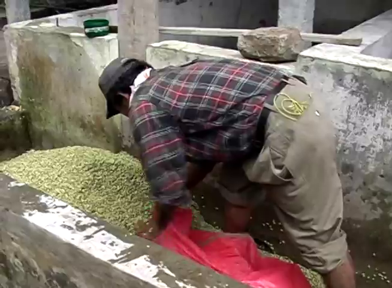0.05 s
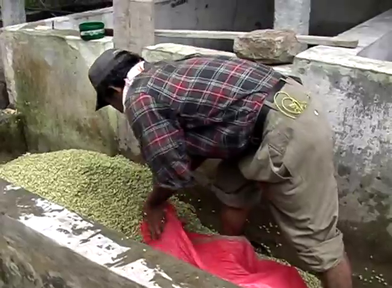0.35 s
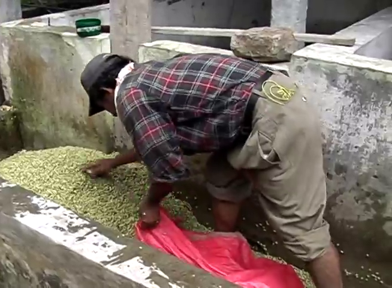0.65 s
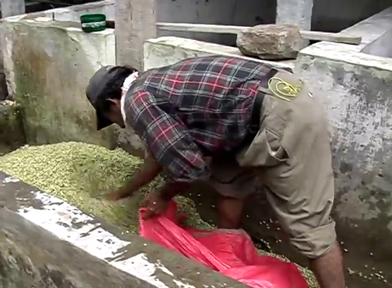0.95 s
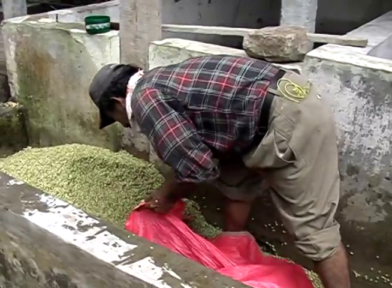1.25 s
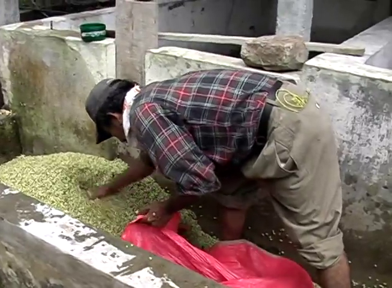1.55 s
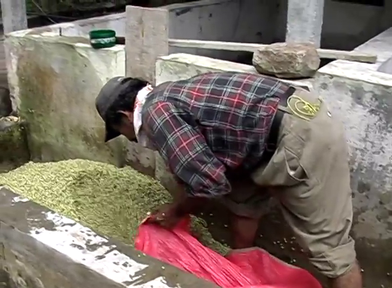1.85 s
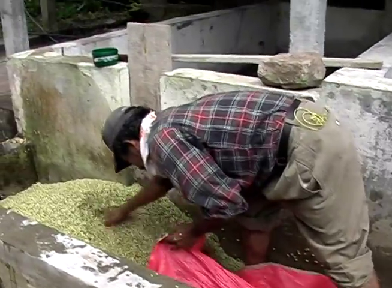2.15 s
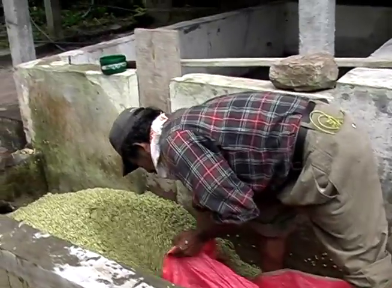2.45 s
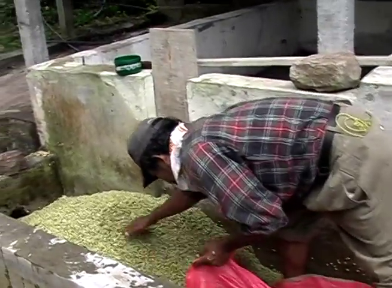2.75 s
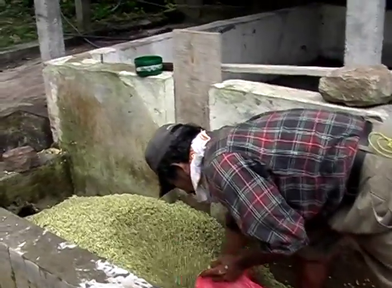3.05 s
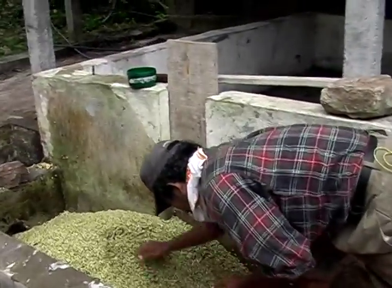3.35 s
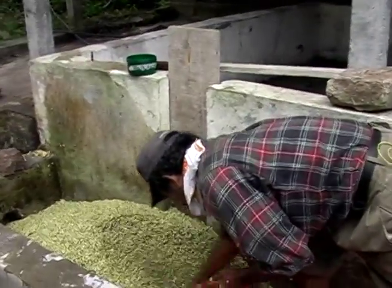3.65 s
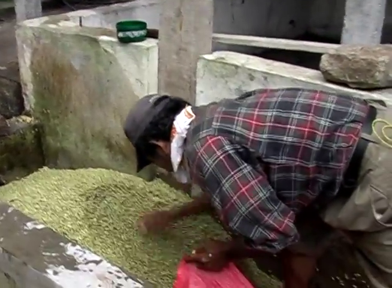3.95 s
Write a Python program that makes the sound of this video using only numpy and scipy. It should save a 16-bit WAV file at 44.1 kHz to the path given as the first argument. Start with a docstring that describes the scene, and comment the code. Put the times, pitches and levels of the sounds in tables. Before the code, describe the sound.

A hand repeatedly rakes dry beans and shoves them, pattering, into a crinkling plastic sack.

```python
"""Dry beans are swept by hand from a heap in a concrete tank into a woven plastic sack.
First the sack crinkles and snaps as it is tugged open, and one faint ping comes from the yard.
Then, five times over, the hand rakes the heap and shoves the load over the sack's mouth in a bright rush,
and the beans patter down inside. Loose beans trickle between strokes. From the second shove on, a few
light bumps thud on the microphone housing, and the sizzle of beans skating on plastic grows."""
import sys
import numpy as np
from scipy.fft import rfft, irfft
from scipy.io import wavfile
from scipy.ndimage import uniform_filter1d

SR = 44100
rng = np.random.default_rng(int(sys.argv[2]) if len(sys.argv) > 2 else 0)


def persist_wave(psi):
    """Save psi, clipped to +-1, as 16-bit WAV."""
    counts = np.round(np.clip(psi, -1, 1) * 32767).astype(np.int16)
    wavfile.write(sys.argv[1], SR, np.atleast_2d(counts).T)


N = 176400
T = np.arange(N) / SR
HZ = np.maximum(np.arange(N // 2 + 1) * SR / N, 1)

# stroke envelopes: (start [s], rise [s], length [s], fall [s], level [dB])
RAKES = [(0.636, 0.024, 0.12, 0.13, -39.5), (0.778, 0.114, 0.27, 0.22, -35),
         (1.445, 0.036, 0.31, 0.15, -34), (2.11, 0.053, 0.28, 0.11, -34.5), (2.76, 0.075, 0.28, 0.11, -32),
         (3.42, 0.18, 0.31, 0.062, -31.5)]  # the hand rakes the heap
SHOVES = [(1.176, 0.033, 0.096, 0.15, -28), (1.856, 0.071, 0.067, 0.23, -25),
          (2.492, 0.063, 0.14, 0.18, -27), (3.135, 0.11, 0.16, 0.3, -27), (3.808, 0.12, 0.11, 0.2, -26)]  # the load crosses the sack's mouth
STRAGGLERS = [(2.09, 0.033, .05, 0.067, -36), (2.73, 0.022, 0.052, .12, -34)]  # late beans skate in after a shove
DROPS = [(1.145, 0.058, 0.22, 0.24, -39), (1.836, 0.12, 0.29, 0.12, -39), (2.484, 0.15, 0.28, 0.15, -40.5),
         (3.128, 0.1, 0.32, 0.1, -40), (3.785, 0.063, 0.26, 0.18, -40.5)]  # beans land inside the sack
# level rides: (time [s], level [dB])
TRICKLE = [(0.0, -81), (0.62, -75), (0.68, -46), (1.15, -38), (1.5, -39), (2.08, -36.5), (2.13, -33.5),
           (2.24, -35.5), (2.47, -36.5), (2.71, -39), (2.78, -34), (2.9, -35), (3.1, -36), (3.5, -34.5),
           (4.0, -36)]  # beans slide on the disturbed heap
SACK_TUG = [(0, -54), (.07, -49.5), (.15, -54), (.24, -61), (.4, -58), (.5, -53.5), (.62, -69)]  # the sack is tugged open
# single snaps of the weave: (time [s], relative level [dB])
SNAPS = [(0.04, -46), (0.07, -42), (.417, -41), (.568, -43), (.6135, -42), (.639, -31.5), (0.671, -29.5)]
# clumps knock on the sack wall: (start [s], length [s], pitch [Hz], level [dB])
KNOCKS = [(0.025, 0.0096, 1270, -50.5), (0.575, .01, 1600, -51), (1.29, .018, 305, -39.5),
          (1.294, 0.038, 1220, -37.5), (1.316, 0.033, 734, -41), (1.924, 0.05, 1110, -41),
          (1.937, 0.017, 262, -41), (1.956, 0.085, 1400, -41), (2.093, .02, 1290, -41.5),
          (2.624, 0.04, 1560, -38), (2.71, .08, 220, -46.5), (2.724, .04, 1140, -43.5),
          (3.205, 0.037, 167, -47.5), (3.32, 0.048, 1450, -40.5)]
# light bumps on the microphone housing: (start [s], length [s], relative level [dB])
BUMPS = [(1.917, 0.037, -41), (1.956, 0.097, -35.5), (2.23, 0.017, -45), (2.31, 0.028, -34.5),
         (2.388, 0.019, -46), (3.335, 0.02, -50)]

# the EQ of each layer: (frequency [Hz], gain [dB])
RAKE_EQ = [(80.0, -40), (220.0, -23), (750.0, -22), (1300.0, -3), (2500.0, -1), (4200.0, 2.3),
           (6000.0, -2.5), (8200.0, -3), (10000.0, -12.5), (16000.0, -12.5)]
SHOVE_EQ = [(80, -39), (500, -21), (1100, -10), (2000, -2.5), (3000, -3.5), (4300, 2.5), (6000, 0),
            (7500, -3), (10000, -8), (16000, -14)]
SIZZLE_EQ = [(2800, -33), (4100, -8.5), (5000, -3), (6400, -4.5), (7400, -33), (12000, -20)]
PATTER_EQ = [(30.0, -54), (60.0, -32), (110.0, -16.5), (200.0, 1), (300.0, 4.5), (500.0, -1), (1200.0, -2),
             (2000.0, -4), (5000.0, -23.5), (16000.0, -17)]
TRICKLE_EQ = [(60.0, -34.5), (200.0, -6.5), (700.0, -9.5), (1500.0, -4.5), (3000.0, -4.5), (5000.0, -0.4),
              (7500.0, -4), (11000.0, -6), (16000.0, -16)]
SACK_EQ = [(50, -25), (250, 2), (1500, -4), (3000, 3.5), (4500, 8), (9000, 0), (16000, 1.5)]
THUD_EQ = [(40, -20), (120, 1), (450, -13), (800, 1), (1500, 2), (3000, -10), (10000, -42)]
YARD_EQ = [(25.0, -50), (60.0, -17), (100.0, -7), (200.0, 3.5), (700.0, -3.5), (1000.0, -7.5),
           (2000.0, -6.6), (4300.0, -9), (9000.0, -16), (16000.0, -31)]
HISS_EQ = [(40, -16), (200, -0.5), (2000, -2), (16000, -13)]
# resonances and hollows of the tank: (centre [Hz], width [Hz], gain [dB])
TANK_BANDS = [(107.5, 25, 3.5), (141, 6.4, -17), (300, 7.3, -2.5), (346, 4.9, 4.5), (412, 170, -2),
              (677, 84, 4), (898, 64, -3.5), (1100, 26, 4)]
# how alike the two channels are: (frequency [Hz], correlation [0..1])
STEREO_LIKENESS = [(40, 0.45), (130, 0.91), (300, 1), (400, 0.99), (520, 0.91), (700, 0.95), (1100, 0.95),
                   (2000, 1), (2700, 0.88), (4500, 0.91), (11000, 1), (13500, 0.88), (16000, 0.64)]
# stereo balance at aside=1: (frequency [Hz], left minus right [dB])
STEREO_BALANCE = [(100, -0.5), (260, 2.5), (400, 1.5), (500, 0), (800, 1.5), (930, -2), (1200, 0),
                  (2100, -0.7), (3100, -7), (4500, -3.5), (7000, -0.3), (16000, 0)]
# phase between the channels: (frequency [Hz], left lead [rad])
STEREO_LEAD = [(60, 0.039), (350, 0.3), (900, -0.49), (1100, 0.036), (2700, -0.52), (3800, -0.085),
               (8000, 0.005), (15000, -0.66)]


def rake():
    """The hand drags through the heap: beans click together so densely that they rustle."""
    return beans(strokes(RAKES), RAKE_EQ, per_s=22000, spread_db=2, clump_db=.68, clump_hz=29.86,
                 aside=.42)


def shove():
    """The whole load tumbles over the sack's mouth in a bright rush."""
    return beans(strokes(SHOVES), SHOVE_EQ, per_s=24000, spread_db=2, clump_db=.48, clump_hz=70,
                 aside=.89)


def sizzle(full_db=-7.5, rise_db_per_s=14, full_at_s=2.8):
    """Beans skate over the plastic, more so as the sack's mouth is pulled closer to the heap."""
    skating = strokes(SHOVES) * from_db(full_db - rise_db_per_s * np.maximum(full_at_s - T, 0))
    flow = np.hypot(skating, strokes(STRAGGLERS))
    return beans(flow, SIZZLE_EQ, per_s=6200, spread_db=1, clump_db=2.5, clump_hz=70, aside=.82)


def patter():
    """Beans land inside the sack: sparser, darker hits of very uneven size."""
    return beans(strokes(DROPS), PATTER_EQ, per_s=3500, spread_db=3.5, clump_db=-.5, clump_hz=35.4,
                 aside=.94)


def trickle():
    """Loose beans keep sliding on the disturbed heap, surging again just after a shove."""
    return beans(curve(TRICKLE), TRICKLE_EQ, per_s=18000, spread_db=2, clump_db=1.12, clump_hz=24.4,
                 aside=.83)


def sack_weave(snap_decay_s=.008, snap_trim_db=-4.5):
    """The tugged plastic weave crinkles in tiny clicks and now and then snaps."""
    crinkle = beans(curve(SACK_TUG), SACK_EQ, per_s=4000, spread_db=2, clump_db=2.5, clump_hz=40,
                    aside=-.1)
    bursts = sum(from_db(db) * (T >= start) * np.exp(-abs(T - start) / snap_decay_s)
                 for start, db in SNAPS)
    snap_noise = in_tank(rng.standard_normal((2, N)), SACK_EQ, aside=.1)
    return crinkle + from_db(snap_trim_db) * bursts * snap_noise


def sack_knocks(rise_s=.016, fall_s=.035, q=3.14):
    """Clumps of beans knock hollowly on the sack wall, pitched by how taut it is there."""
    return sum(strokes([(start, rise_s, length, fall_s, db)]) * ringing(hz, hz / q)
               for start, length, hz, db in KNOCKS)


def housing_bumps(rise_s=.0098, fall_s=.034, rest_db=-64, thud_db=-9):
    """The bumped microphone housing thuds and rings, pushing the two capsules in opposite directions."""
    bumps = strokes([(start, rise_s, length, fall_s, db) for start, length, db in BUMPS])
    thud = from_db(thud_db) * shaped_noise(THUD_EQ, N)
    ring = ringing(hz=475, width_hz=75)
    capsule_gains = np.array([[1.2], [-.6]])
    return (bumps + from_db(rest_db)) * (ring + thud) * capsule_gains


def yard(air_db=-54, ping_db=-45, ping_hz=1140, ping_at_s=.486, ping_length_s=.019):
    """A soft, wavering bed of outdoor air with one brief ping."""
    air = from_db(air_db + drift(rate_hz=16)) * in_tank(rng.standard_normal((2, N)), YARD_EQ, aside=-.1)
    swell = np.sin(np.pi * np.clip((T - ping_at_s) / ping_length_s, 0, 1))
    return air + from_db(ping_db) * swell * np.sin(2 * np.pi * ping_hz * T)


def microphone_hiss(level_db=-56.5):
    """A faint noise floor, unrelated in the two channels."""
    return from_db(level_db) * shaped_noise(HISS_EQ, (2, N))


def beans(flow, eq, per_s, spread_db, clump_db, clump_hz, aside):
    """The grain of a moving mass: more flow brings more and louder contacts, in small clumps."""
    density = np.maximum(flow / flow.max(), .4)
    grains = contacts(per_s * density, spread_db) / np.sqrt(density)
    clumping = from_db(clump_db * drift(clump_hz))
    return flow * clumping * in_tank(grains, eq, aside)


def contacts(per_s, spread_db):
    """Two unrelated streams of random clicks, each click with its own size and strength per octave."""
    hits = rng.random((2, N)) < per_s / SR
    clicks = hits * from_db(spread_db * np.minimum(rng.exponential(1, (2, N)), 4))
    octave = np.clip(np.log2(HZ / 500), 0, 5)
    spectrum = 0
    for k in range(6):
        band = np.sqrt(np.maximum(1 - abs(octave - k), 0))
        spectrum = spectrum + band * rfft(clicks * rng.uniform(-.9, 1, (2, N)))
    return irfft(spectrum, N)


def ringing(hz, width_hz):
    """A resonance kept ringing by noise, compressed to an even level."""
    resonance = 1 / (1 + 1j * (HZ / hz - hz / HZ) * hz / width_hz)
    ring = rms_one(irfft(rfft(rng.standard_normal(N)) * resonance ** 2, N))
    local_power = uniform_filter1d(ring ** 2, size=900)
    return rms_one(ring / np.sqrt(local_power + .1))


def in_tank(streams, eq, aside):
    """Colour a direct and a scattered stream by source and tank; aside scales the left-right shading."""
    tank_db = sum(db * np.exp(-((HZ - hz) / width) ** 2) for hz, width, db in TANK_BANDS)
    direct, scattered = rfft(streams) * from_db(over_hz(eq) + tank_db) * wall_echoes()
    alike = np.clip(over_hz(STEREO_LIKENESS), -1, .995)
    sides = np.array([[1], [-1]])
    stereo = np.sqrt(1 + alike) * direct + sides * np.sqrt(1 - alike) * scattered
    shading = from_db(aside * sides * over_hz(STEREO_BALANCE) / 2)
    phase_lead = np.exp(.5j * sides * over_hz(STEREO_LEAD))
    return rms_one(irfft(stereo * shading * phase_lead, N))


def wall_echoes(wet_db=-10, t60_s=.1, predelay_s=.003):
    """The tank's frequency response: direct sound plus a short, diffuse tail off the walls."""
    tail = rng.standard_normal(N) * from_db(-60 * np.minimum(T / t60_s, 4)) * (T > predelay_s)
    return 1 + from_db(wet_db) * rfft(tail) / np.sqrt(np.sum(tail ** 2))


def strokes(rows):
    """Each stroke swells, holds until its length is over and dies away; overlaps add in power."""
    power = 0
    for start, rise, length, fall, db in rows:
        swell = np.clip((T - start) / rise, 0, 1)
        fade = np.exp(-2 * (np.maximum(T - start - length, 0) / fall) ** 1.3)
        power = power + (from_db(db) * swell * fade) ** 2
    return np.sqrt(power)


def shaped_noise(eq, shape):
    """Noise through an EQ, at unit power."""
    return rms_one(irfft(rfft(rng.standard_normal(shape)) * from_db(over_hz(eq)), N))


def drift(rate_hz):
    """A random wobble at unit power, mostly slower than rate_hz."""
    return rms_one(irfft(rfft(rng.standard_normal(N)) / (1 + (HZ / rate_hz) ** 2), N))


def curve(rows):
    """A level ride as a gain at every sample."""
    return from_db(np.interp(T, *np.transpose(rows)))


def over_hz(points):
    """Breakpoints joined over log frequency."""
    hz, value = np.transpose(points)
    return np.interp(np.log(HZ), np.log(hz), value)


def from_db(db):
    """Decibels to gain."""
    return 10 ** (np.asarray(db) / 20)


def rms_one(x):
    """Scale to unit power."""
    return x / np.sqrt(np.mean(x ** 2) + 1e-20)


def scene():
    """The mix: beans up front, then the sack, the yard and the microphone's own noises."""
    sweeping = rake() + shove() + sizzle() + patter() + trickle()
    return sweeping + sack_weave() + sack_knocks() + yard() + housing_bumps() + microphone_hiss()


def record(dry, cutoff_hz=15800):
    """A brick-wall low-pass takes off the top of the treble."""
    return irfft(rfft(dry) / np.sqrt(1 + (HZ / cutoff_hz) ** 400), N)


dry = scene()
out = record(dry)
persist_wave(out)
```